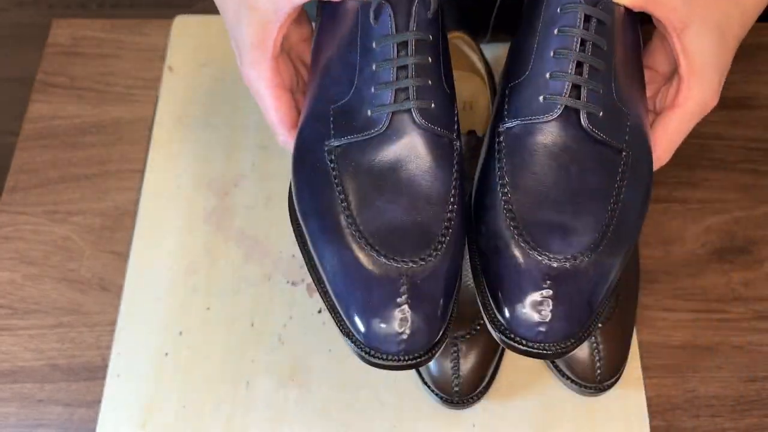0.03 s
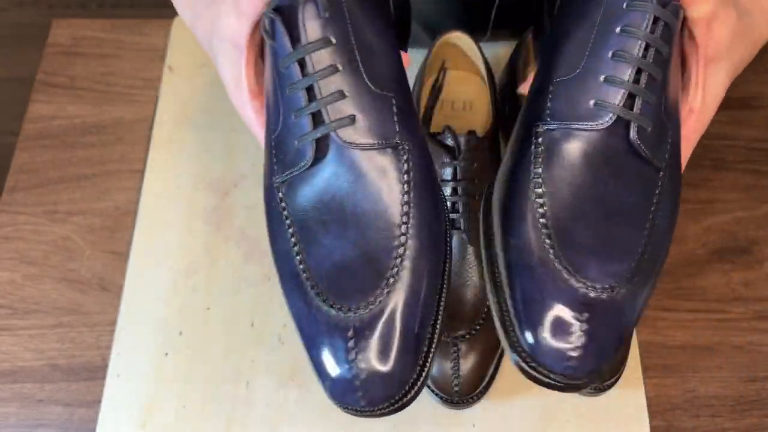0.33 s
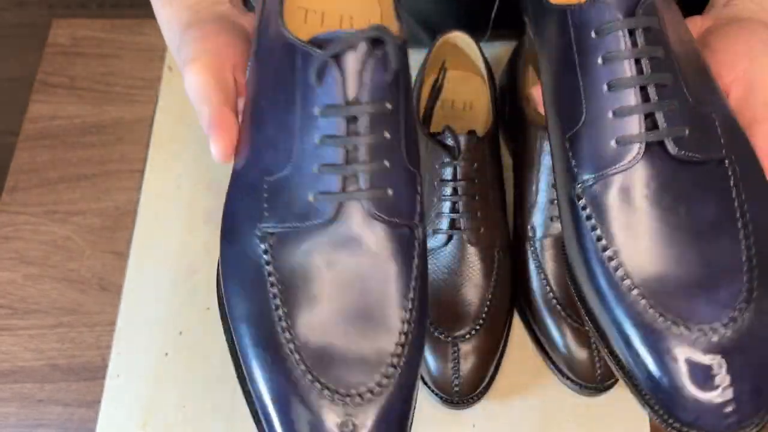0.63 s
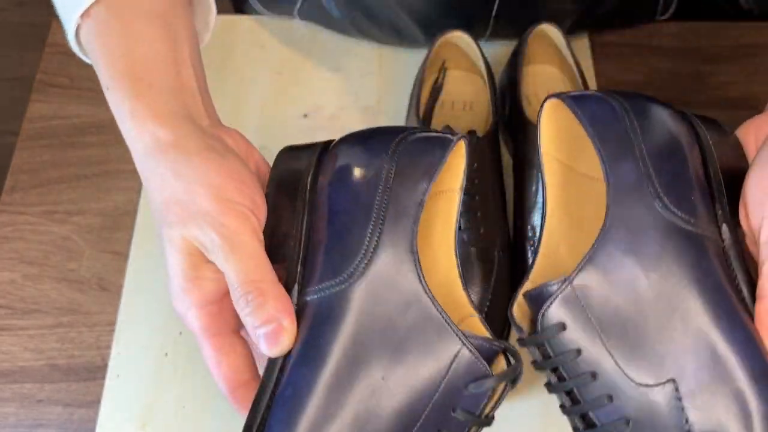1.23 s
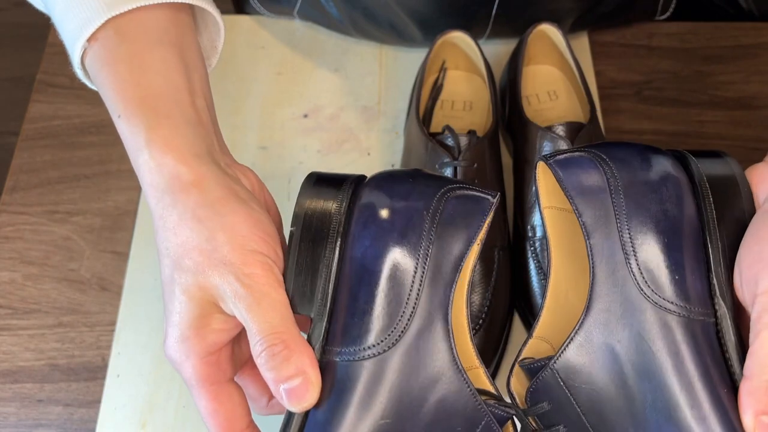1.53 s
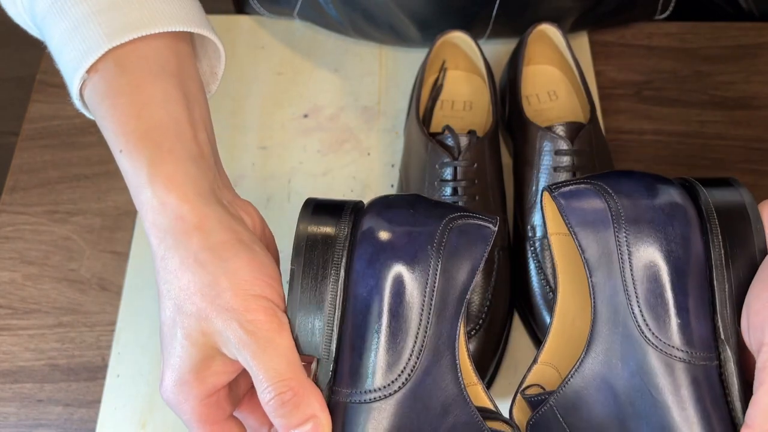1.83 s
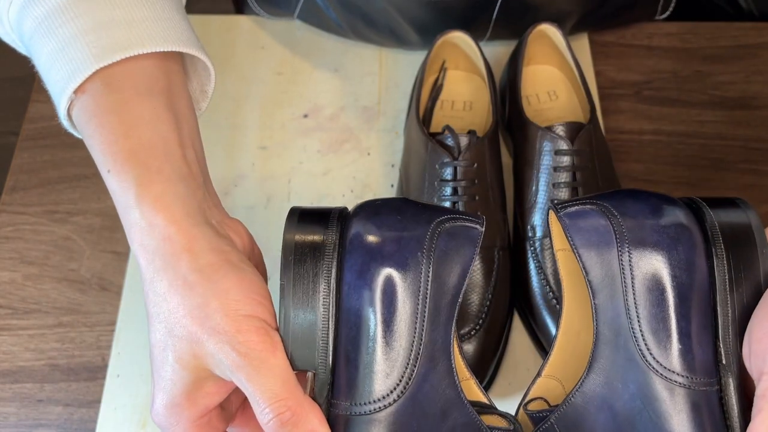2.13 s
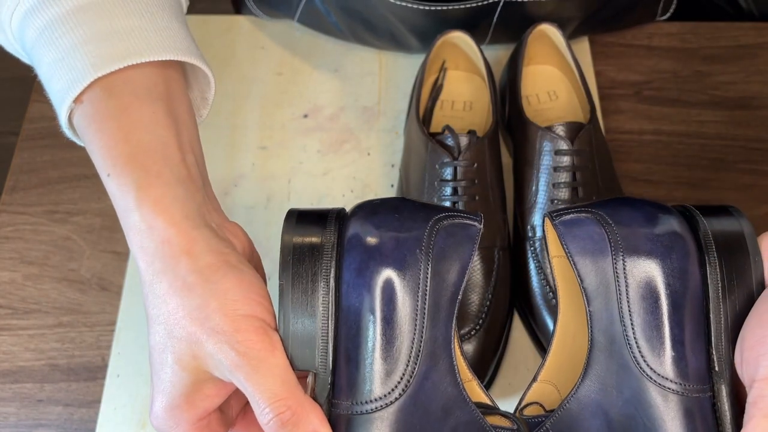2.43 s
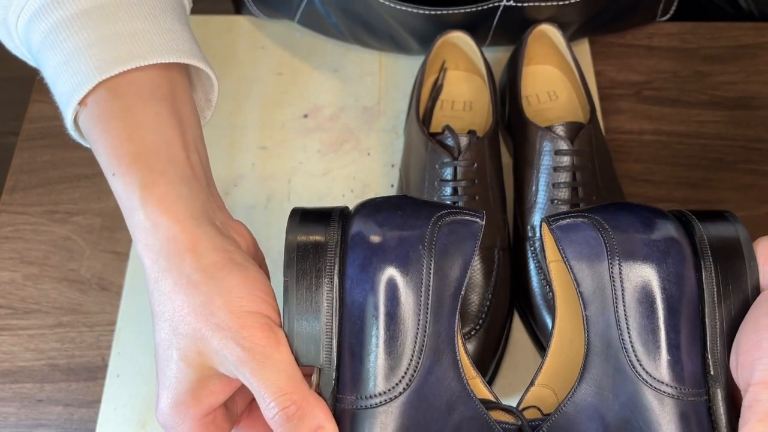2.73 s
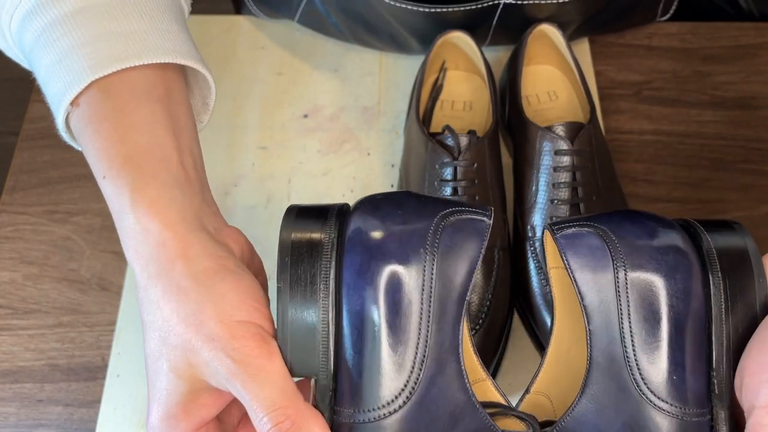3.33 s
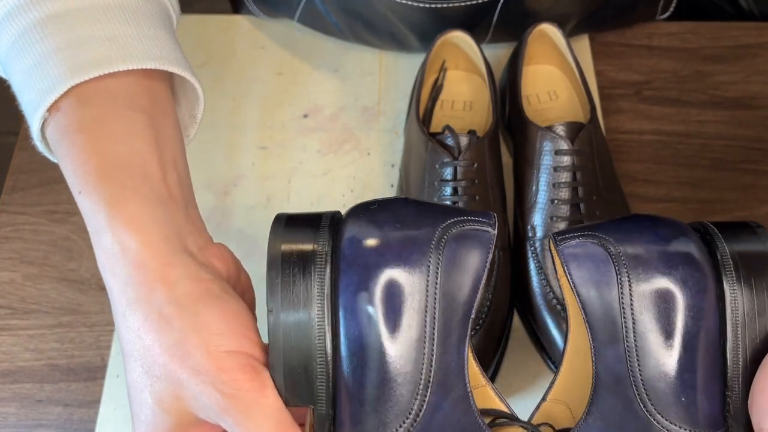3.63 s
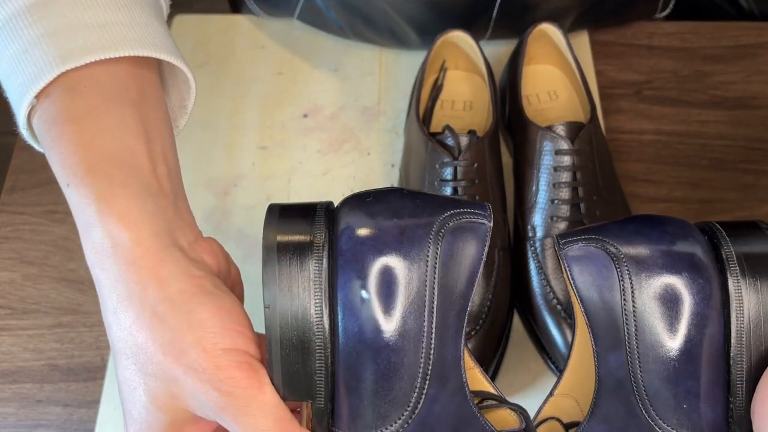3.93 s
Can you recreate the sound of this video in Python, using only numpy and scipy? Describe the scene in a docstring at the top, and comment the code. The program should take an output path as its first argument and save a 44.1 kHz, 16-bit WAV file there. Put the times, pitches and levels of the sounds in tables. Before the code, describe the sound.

Leather shoes are turned in the hands close by, with soft hollow rubbing, light ticks and finger pats for the first 1.5 seconds, the clearest pat near 0.6. Just after 2 seconds they land on a board with two quick low knocks, the loudest sounds, and the table shudders briefly. Faint leather creaks and ticks return from about 3 to 4 seconds. A low room hum continues throughout.

```python
"""A quiet room with a low hum: two leather shoes are turned over in the hands, close to the microphone.
Palms rub and hiss over the hollow uppers; stick-slip friction rings the air inside.
Fingers pat the shoes; leather and laces tick. The shoes touch down one after the other on a board:
the sole edge ticks, the weight lands with a low knock, and the table shudders."""
import sys
import numpy as np
from scipy import signal
from scipy.fft import rfft, irfft
from scipy.io import wavfile

SR = 44100
rng = np.random.default_rng(int(sys.argv[2]) if len(sys.argv) > 2 else 0)


def persist_wave(psi):
    """Save psi, clipped to +-1, as 16-bit WAV."""
    counts = np.round(np.clip(psi, -1, 1) * 32767).astype(np.int16)
    wavfile.write(sys.argv[1], SR, np.atleast_2d(counts).T)


N = 176400

# stereo image of the shoes and the reverb (frequency [Hz], left-right correlation [0..1])
CORRELATION = [(100, 0.8), (280, 1), (550, 0.34), (1100, .3), (2200, 0.93), (4500, 0.19), (8000, 0.042),
               (13000, 0.88)]


def amp(db):
    return 10 ** (np.asarray(db) / 20)


def unit(x):
    """Scales to rms 1."""
    return x / np.sqrt(np.mean(x ** 2) + 1e-20)


def read(points, hz):
    """Interpolates a table on a log-frequency axis."""
    f, value = np.transpose(points)
    return np.interp(np.log(hz + 1), np.log(f + 1), value)


def level(points):
    """Gain over time from (time [s], level [dB]) rows; silent outside them."""
    s, db = np.transpose(points)[:2]
    return amp(np.interp(np.arange(N) / SR, s, db, left=-120, right=-120))


def fade(t, t60_s):
    return np.exp(-np.log(1000) * t / t60_s)


def rise(t, tau_s):
    return 1 - np.exp(-t / tau_s)


def add(mix, start_s, sound):
    part = mix[:, round(start_s * SR):][:, :sound.shape[1]]
    part += sound[:, :part.shape[1]]


def colour(x, gain):
    """Filters by gain(hz); rms 1."""
    hz = np.fft.rfftfreq(x.shape[-1], 1 / SR)
    return unit(irfft(rfft(x) * gain(hz), x.shape[-1]))


def tint(x, points):
    """Filters by (frequency [Hz], gain [dB]) rows; rms 1."""
    return colour(x, lambda hz: amp(read(points, hz)))


def peaks(resonances, hz):
    """Gain of (centre [Hz], width [Hz], gain [dB]) resonances."""
    return np.sqrt(sum(amp(db) ** 2 / (1 + ((hz - f) / w) ** 2) ** 2 for f, w, db in resonances))


def resonate(x, hz, width_hz):
    """Steep resonance that follows the curve hz; rms 1."""
    carrier = np.exp(2j * np.pi * np.cumsum(hz) / SR)
    pole = np.exp(-np.pi * width_hz / SR)
    baseband = signal.lfilter([1], np.poly([pole, pole]), x / carrier)
    return unit((carrier * baseband).real)


def stereo(x, correlation):
    """Left and right from one common and two separate signals."""
    size = x.shape[1]
    common = np.clip(read(correlation, np.fft.rfftfreq(size, 1 / SR)), 0, 1)
    spectra = rfft(x)
    return irfft(np.sqrt(common) * spectra[0] + np.sqrt(1 - common) * spectra[1:], size)


def noise(size):
    """White noise with the stereo image of the shoes."""
    return stereo(rng.standard_normal((3, size)), CORRELATION)


def drift(time_s):
    """Slow random curve; rms 1."""
    return colour(rng.standard_normal(N), lambda hz: np.exp(-(hz * time_s) ** 2))


def slips(per_s, spread_db):
    """Stick-slip: tiny uneven clicks whose level comes in clumps."""
    strength = amp(spread_db * np.minimum(rng.exponential(1, N), 4))
    slipping = rng.random(N) < per_s / SR
    return noise(N) * strength * slipping * amp(2.25 * drift(time_s=0.014))


def room(x, wet_db):
    """Adds a tail of sparse reflections, each band dying at its own rate."""
    # reverb decay (frequency [Hz], t60 [s])
    decay = [(100, 0.48), (300, 0.23), (1000, 0.4), (2500, 0.2), (5000, 0.31), (12000, 0.43)]
    taps_per_s = 3000
    taps = rng.choice([-1., 1.], (3, SR)) * (rng.random((3, SR)) < taps_per_s / SR)
    taps[:, :SR // 250] = 0  # 4 ms pre-delay
    hz, t, bands = signal.stft(stereo(taps, CORRELATION), SR, nperseg=256)
    tail = signal.istft(bands * fade(t, read(decay, hz)[:, None]), SR, nperseg=256)[1]
    tail /= np.linalg.norm(tail[0])
    return x + amp(wet_db) * signal.fftconvolve(x, tail, axes=1)[:, :N]


def background():
    """Wavering low hum over faint room noise."""
    # room noise (frequency [Hz], gain [dB])
    air_spectrum = [(20, -24), (45, 2.5), (70, 7.5), (105, 2), (160, -11.5), (300, -16.5), (600, -19.5),
                    (1200, -29), (2500, -32.5), (5000, -38), (7000, -40), (8400, -56.5), (10000, -41),
                    (14000, -46.5)]
    # its stereo image (frequency [Hz], left-right correlation [0..1])
    air_correlation = [(50, 0.94), (150, 0.96), (400, 0.7), (1500, 0.21), (12000, 0.16)]
    hum_hz, hum_db, air_db = 53.72, -49.5, -67.5
    hum = np.sqrt(2) * np.sin(2 * np.pi * hum_hz * np.arange(N) / SR)
    hum *= amp(hum_db + drift(time_s=0.078))
    air = tint(stereo(rng.standard_normal((3, N)), air_correlation), air_spectrum)
    return hum + amp(air_db) * air


def sleeves():
    """Cloth brushes as the wrists turn."""
    # wrist motion (time [s], relative level [dB])
    envelope = [(0, -89), (.1, -72), (.22, -71), (.38, -75), (.53, -79.5), (.68, -80.5), (.82, -78),
                (.96, -69), (1.15, -69), (1.36, -76.5), (1.6, -77), (1.8, -88)]
    # cloth (frequency [Hz], gain [dB])
    spectrum = [(70, -27), (130, 5.5), (220, -5), (320, 1), (450, -13), (800, -30), (3000, -61)]
    return amp(0.5) * level(envelope) * tint(noise(N), spectrum)


def lowering():
    """Soft brushing as the shoes are lowered."""
    # descent (time [s], level [dB])
    envelope = [(1.72, -83), (1.83, -65), (1.94, -66), (2.05, -69.5), (2.1, -69)]
    # brushing (frequency [Hz], gain [dB])
    spectrum = [(200, -9.5), (450, 0), (750, 0), (980, 4), (1200, -20.5), (1700, -9), (2600, -15.5),
                (3300, -28), (6000, -44)]
    return level(envelope) * tint(slips(per_s=7000, spread_db=1.5), spectrum)


def skin_hiss():
    """Skin slides on polish."""
    # slides (time [s], relative level [dB])
    envelope = [(0.02, -90.5), (0.1, -81), (0.28, -79), (0.45, -70.5), (0.535, -82.5), (0.58, -78.5),
                (0.64, -74.5), (0.73, -79), (0.81, -86.5), (0.84, -76.5), (1.03, -92), (1.2, -89.5),
                (1.27, -95), (1.35, -81.5), (1.42, -90.5), (1.58, -92), (1.75, -94.5), (1.87, -89),
                (2.1, -92), (2.36, -106), (3.15, -106), (3.36, -89), (3.5, -85.5), (3.68, -87.5),
                (3.83, -89.5), (3.96, -102)]
    # hiss (frequency [Hz], gain [dB])
    spectrum = [(2000, 3), (4500, 0.5), (7000, -1.5), (8400, -24.5), (9800, 4), (12000, 2.5), (13800, 2.5),
                (15000, -29.5)]
    return amp(3.5) * level(envelope) * tint(noise(N), spectrum)


def finger_squeaks():
    """A finger squeaks on the polish: a faint, rough glide that swells and fades."""
    # squeaks (start [s], length [s], level [dB], first pitch [Hz], last pitch [Hz])
    glides = [(0.051, 0.15, -75, 2950, 2980), (0.292, 0.081, -71, 2940, 2620),
              (0.813, 0.073, -76.5, 2620, 2700), (1.314, 0.074, -80, 3400, 3620)]
    out = np.zeros((2, N))
    for start_s, length_s, db, first_hz, last_hz in glides:
        progress = np.clip(np.arange(SR // 4) / SR / length_s, 0, 1)
        pitch_hz = first_hz + (last_hz - first_hz) * progress
        whistle = resonate(noise(len(progress)), pitch_hz, width_hz=460)
        add(out, start_s, amp(db) * np.sin(np.pi * progress) * whistle)
    return out


def grip_creak():
    """Leather creaks as the grip shifts on the resting shoes."""
    # grip shifts (time [s], relative level [dB])
    envelope = [(2.9, -91.5), (2.98, -78.5), (3.08, -108.5), (3.205, -82), (3.225, -69), (3.3, -76),
                (3.34, -71), (3.4, -75), (3.45, -90), (3.56, -86), (3.74, -98), (3.82, -77.5), (3.9, -111),
                (4.0, -90)]
    # creak (frequency [Hz], gain [dB])
    spectrum = [(300, -5), (700, 8), (1200, -17), (1550, 3), (2000, 2.5), (2700, -7), (3400, -19),
                (4300, -28), (7000, -25), (9000, -51), (15000, -22)]
    return amp(-0.5) * level(envelope) * tint(slips(per_s=1100, spread_db=2.5), spectrum)


def grain_scuff():
    """Fingers catch and slip on the leather grain."""
    # finger strokes (time [s], relative level [dB])
    envelope = [(0.04, -84), (0.07, -72), (0.15, -74), (0.23, -79), (0.33, -77), (0.46, -75.5), (0.54, -82),
                (0.58, -69.5), (0.69, -65.5), (0.8, -72), (0.85, -70), (0.96, -69), (1.0, -80),
                (1.1, -84.5), (1.18, -74.5), (1.27, -85), (1.31, -81.5), (1.35, -71.5), (1.41, -99),
                (1.62, -91), (1.68, -93), (1.78, -88), (1.85, -76.5), (2.02, -107)]
    # grain (frequency [Hz], gain [dB])
    spectrum = [(500, -15), (1300, -2.5), (2100, 8), (2750, 3.5), (3400, -2.5), (4300, -0.5), (5500, -10),
                (7000, -3.5), (9000, -49), (15000, -27)]
    return amp(-2.5) * level(envelope) * tint(slips(per_s=7000, spread_db=1.5), spectrum)


def sole_rasp():
    """The soles rasp against the palms as the shoes tip over."""
    # rasp (time [s], level [dB])
    envelope = [(.055, -76.5), (.14, -68), (.2, -95), (.53, -82), (.58, -68), (.65, -67.5), (.73, -67.5),
                (.8, -72.5), (.85, -67), (.98, -93)]
    centre_hz, width_hz = 1155, 130
    friction = slips(per_s=3300, spread_db=1)
    return level(envelope) * colour(friction, lambda hz: peaks([(centre_hz, width_hz, 0)], hz))


def palm_rub():
    """Palm friction rings the air in the shoe; the pitch drops as the hands cover the opening."""
    # strokes before and after the pause (time [s], relative level [dB], cavity pitch [Hz])
    early = [(0.03, -86, 480), (0.07, -63.5, 480), (0.155, -59.5, 484), (0.205, -77, 480),
             (0.235, -70, 480), (0.28, -77, 462), (0.32, -61.5, 476), (0.385, -64.5, 493),
             (0.43, -72.5, 456), (0.535, -73, 470), (0.63, -58.5, 496), (0.73, -64.5, 523),
             (0.80, -72.5, 475), (0.85, -66.5, 470), (0.96, -66.5, 365), (1.05, -70, 318), (1.27, -74, 303),
             (1.32, -71, 420), (1.37, -61, 474), (1.41, -75, 462), (1.66, -77.5, 430)]
    late = [(2.88, -100, 610), (2.98, -76, 680), (3.08, -107, 680), (3.155, -71, 684), (3.195, -74, 590),
            (3.235, -75, 582), (3.33, -74.5, 540), (3.36, -63, 475), (3.415, -68, 446), (3.46, -85.5, 302),
            (3.74, -97, 450), (3.81, -85, 480), (4.0, -100, 496)]
    # higher resonances of the hollow shoe (centre [Hz], width [Hz], gain [dB])
    resonances = [(769, 120, 2), (1064, 220, -1), (1490, 91, 0)]
    strokes = early + late
    times_s, _, cavity_hz = np.transpose(strokes)
    friction = slips(per_s=3300, spread_db=1)
    cavity = resonate(friction, np.interp(np.arange(N) / SR, times_s, cavity_hz), width_hz=205)
    hollow = colour(friction, lambda hz: peaks(resonances, hz))
    return level(strokes) * (amp(-1.5) * cavity + amp(-8) * hollow)


def touches(events, t60_s, rise_s, width_oct, skirt_db, body=np.ones_like):
    """Damped noise bursts, each around its own pitch, coloured by the touched body."""
    out, t = np.zeros((2, N)), np.arange(SR // 10) / SR
    for start_s, db, centre_hz in events:
        band = lambda hz: np.exp(-.5 * np.abs(np.log2((hz + 1) / centre_hz) / width_oct) ** 3)
        skirt = lambda hz: amp(skirt_db) * hz / (hz + centre_hz)
        burst = colour(noise(len(t)), lambda hz: body(hz) * (band(hz) + skirt(hz)))
        add(out, start_s, amp(db) * burst * fade(t, t60_s) * rise(t, rise_s))
    return out


def lace_tip():
    """A hard lace tip taps the upper, ringing a few damped resonances."""
    # taps (time [s], level [dB])
    taps = [(1.446, -65), (1.518, -76)]
    # tap resonances (centre [Hz], width [Hz], gain [dB])
    resonances = [(1950, 160, 6.5), (3630, 260, 3), (4530, 200, -7), (5160, 300, -10)]
    out, t = np.zeros((2, N)), np.arange(SR // 4) / SR
    for start_s, db in taps:
        rattle = colour(noise(len(t)), lambda hz: peaks(resonances, hz))
        add(out, start_s, amp(db) * rattle * fade(t, t60_s=0.063))
    return out


def leather_ticks():
    """Leather and laces tick, coloured by the stiff upper."""
    # ticks (time [s], level [dB], centre [Hz])
    ticks = [(.063, -63, 2740), (.122, -61.5, 2630), (.793, -62.5, 4570), (1.446, -68, 3640),
             (1.518, -51.5, 2300), (1.617, -68, 2260), (1.727, -73, 2820), (2.3115, -54.5, 2070),
             (3.210, -56.5, 2200), (3.261, -61, 2180), (3.354, -58.5, 1520), (3.376, -58.5, 2220),
             (3.395, -61.5, 2250), (3.490, -67, 2260), (3.571, -69.5, 2300), (3.690, -70.5, 3950),
             (3.799, -64, 1980), (3.818, -68, 2190), (3.951, -63, 2020)]
    # resonances of the upper (centre [Hz], width [Hz], gain [dB])
    resonances = [(1040, 65, 16.5), (1540, 35, -1), (2160, 220, -0.5), (2760, 215, -7.5), (3280, 36, -7.5),
                  (5630, 250, 4)]
    upper = lambda hz: amp(-4.5) + peaks(resonances, hz)
    return touches(ticks, t60_s=0.023, rise_s=0.0003, width_oct=0.62, skirt_db=-18, body=upper)


def finger_pats():
    """Fingers pat the uppers: short, dull bursts."""
    # pats (time [s], level [dB], centre [Hz])
    pats = [(.063, -62, 795), (.121, -57.5, 930), (.500, -61.5, 1100), (.553, -62, 1010),
            (.617, -43.5, 960), (.636, -52, 1070), (.845, -58, 1100), (1.313, -65, 780), (1.359, -53, 800),
            (1.366, -53.5, 456), (1.519, -55, 1010), (2.962, -72, 690), (3.354, -62, 600),
            (3.875, -72, 1020)]
    return touches(pats, t60_s=0.035, rise_s=0.00053, width_oct=0.45, skirt_db=-51)


def touchdowns():
    """The sole edge ticks, then the weight lands: a thud, the board rings, the table shudders."""
    # landings (time [s], relative knock level [dB], low-pass cutoff [Hz], tick level [dB],
    # shudder level [dB], tick-to-knock delay [s])
    landings = [(2.0509, -40, 1020, -48.5, -37, 0.0057), (2.1340, -36, 1780, -51.5, -34, 0.0033)]
    # board modes (frequency [Hz], gain [dB], t60 [s])
    modes = [(129.7, -7.5, 0.34), (177, -5.5, 0.14), (241.6, -1.5, 0.25), (296, -5, 0.27),
             (362.2, -3.5, 0.23), (517.4, -2.5, 0.17), (681, -7, 0.15), (802.5, 0, 0.19), (881, -5, .2),
             (1012, -4, 0.29), (1051, -7, 0.091), (1145, -5, 0.16), (1292, -13, 0.14), (1500, -15, 0.11)]
    # dense clatter of sole and board (frequency [Hz], gain [dB])
    thud_spectrum = [(60, -18), (150, -0.5), (300, 4.5), (430, -7.5), (600, -4.5), (1100, -4),
                     (1700, -11.5), (2150, -23.5), (2600, -40), (3400, -41), (8000, -55), (15000, -69)]
    # sole-edge tick (frequency [Hz], gain [dB])
    edge_spectrum = [(300, -24), (1000, -28), (1800, 17), (3200, 4.5), (4200, 13), (4900, 12.5), (5800, -4),
                     (7300, 0.5), (10000, -27), (15000, 2.5)]
    table_hz, mode_rise_cycles = 63.35, 0.62
    board_gain_db, thud_gain_db, tick_pan_db = -4.5, 0.5, 2
    board, thuds, edge, table = np.zeros((4, 2, N))
    t, sides = np.arange(SR) / SR, np.array([[1], [-1]])
    for tick_s, knock_db, cutoff_hz, tick_db, shudder_db, delay_s in landings:
        tick = tint(noise(SR), edge_spectrum) * fade(t, t60_s=0.022)
        add(edge, tick_s, amp(tick_db + tick_pan_db * sides) * tick)
        knock_s = tick_s + delay_s
        softness = lambda hz: 1 / np.sqrt(1 + (hz / cutoff_hz) ** 4)
        for mode_hz, mode_db, t60_s in modes:
            phase = 2 * np.pi * (mode_hz * t + rng.random())
            spread = sides * rng.choice([-1, 1]) * min(mode_hz / 800, 1)  # higher modes are wider
            ring = np.sin(phase + spread) * fade(t, t60_s) * rise(t, mode_rise_cycles / mode_hz)
            add(board, knock_s, amp(knock_db + board_gain_db + mode_db) * softness(mode_hz) * ring)
        clatter = colour(noise(SR), lambda hz: amp(read(thud_spectrum, hz)) * softness(hz))
        thud = clatter * fade(t, t60_s=0.14) * rise(t, tau_s=0.00027)
        add(thuds, knock_s, amp(knock_db + thud_gain_db) * thud)
        shudder = np.sin(2 * np.pi * table_hz * t) * fade(t, t60_s=0.58) * rise(t, tau_s=0.03)
        add(table, knock_s, amp(shudder_db) * shudder[None])
    return room(board, wet_db=-5.5) + room(thuds, wet_db=-3) + room(edge, wet_db=-5) + table


def scene():
    ticks = room(leather_ticks() + lace_tip(), wet_db=-3)
    pats = room(finger_pats(), wet_db=-6)
    ambience = background()
    handling = sole_rasp() + grain_scuff() + grip_creak() + skin_hiss()
    handling += sleeves() + lowering() + palm_rub() + finger_squeaks()
    return ambience + room(handling, wet_db=-9) + ticks + pats + touchdowns()


def record(dry):
    """Low-pass band limit."""
    cutoff_hz = 14450
    lowpass = signal.firwin(511, cutoff_hz, window=("kaiser", 9), fs=SR)
    return signal.oaconvolve(dry, lowpass[None], "same")


dry = scene()
out = record(dry)
persist_wave(out)
```